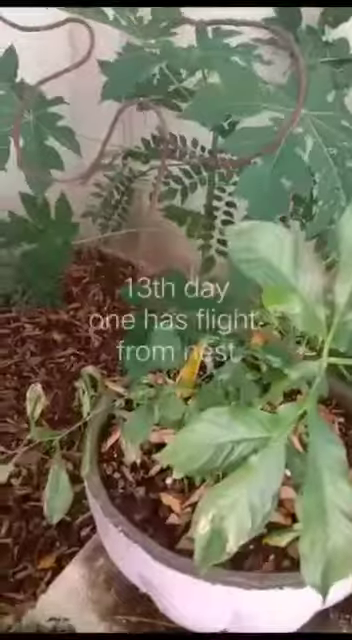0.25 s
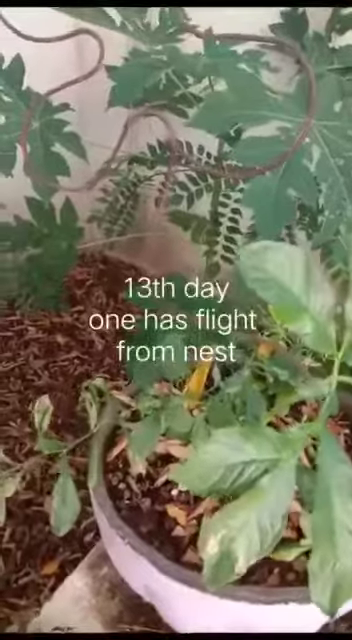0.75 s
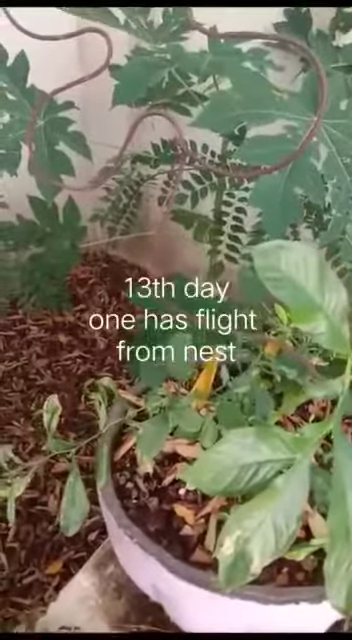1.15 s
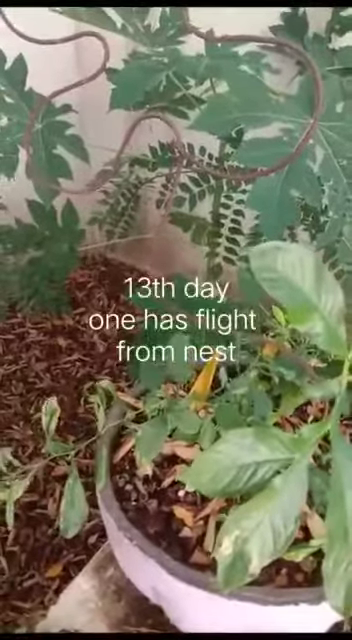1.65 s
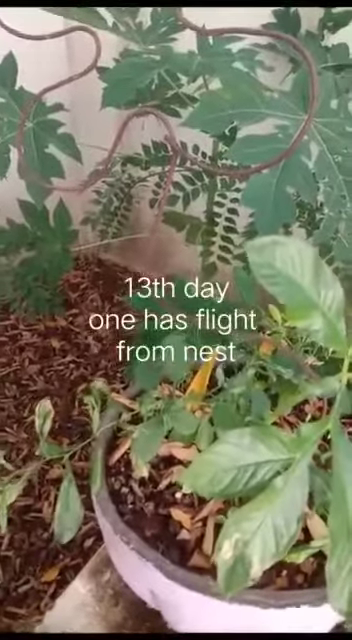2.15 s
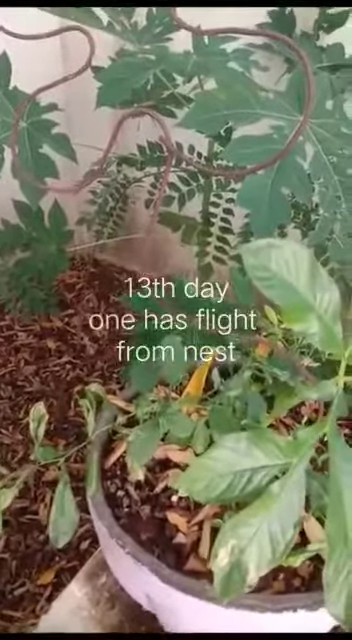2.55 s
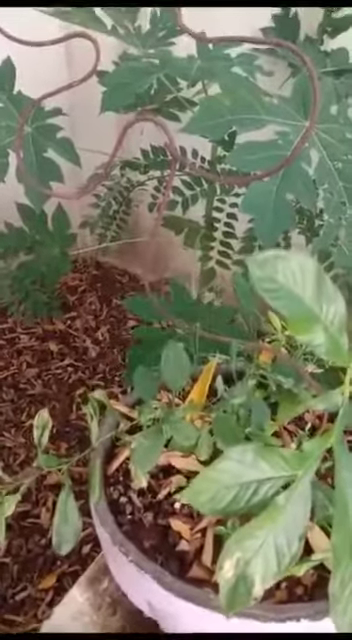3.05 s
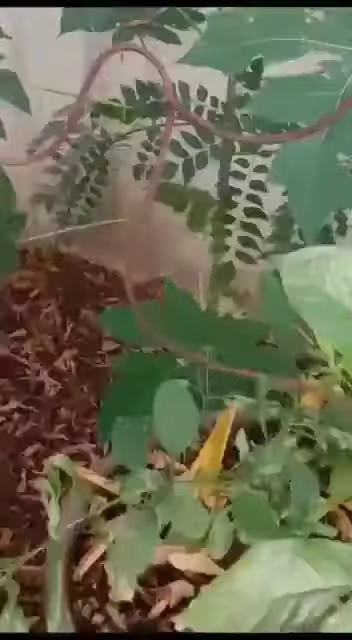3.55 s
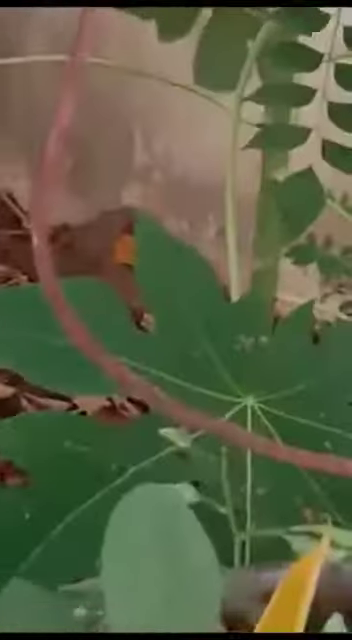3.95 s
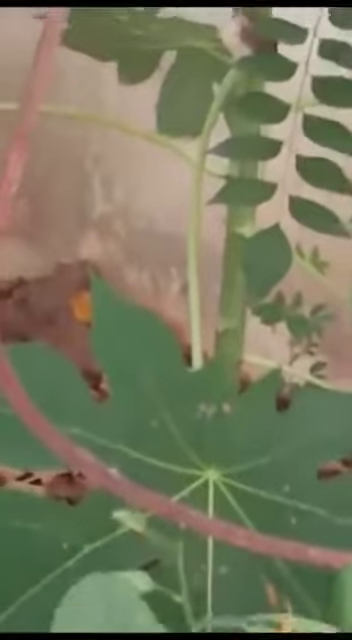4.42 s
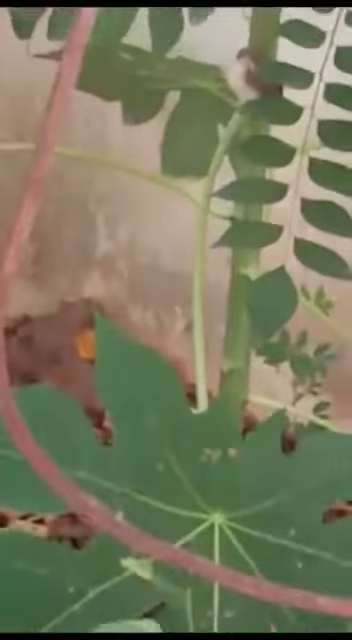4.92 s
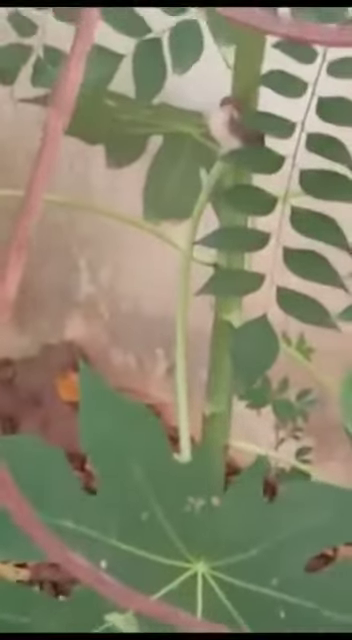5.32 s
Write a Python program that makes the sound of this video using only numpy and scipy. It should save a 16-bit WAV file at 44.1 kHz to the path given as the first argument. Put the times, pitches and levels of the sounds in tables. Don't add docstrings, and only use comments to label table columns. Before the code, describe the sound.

In a walled garden, short raspy bird chirps come at intervals above faint town noise and a fluttering machine hum, with one louder reply.

```python
import sys
import numpy as np
from scipy import signal
from scipy.fft import rfft, irfft, next_fast_len
from scipy.io import wavfile
from scipy.ndimage import uniform_filter1d, map_coordinates

SR = 44100
rng = np.random.default_rng(int(sys.argv[2]) if len(sys.argv) > 2 else 0)


def rack_gain(trim_db):
    fader = np.asarray(trim_db, float)
    return 10 ** (fader / 20)


def generate_wav(signal):
    frames = np.transpose(np.atleast_2d(signal))
    scaled = np.clip(frames, -1, 1) * 32767
    pcm = np.round(scaled).astype(np.int16)
    wavfile.write(sys.argv[1], SR, pcm)


N = 246078
T = np.arange(N) / SR

# multiple of the pitch, level in dB.
OVERTONES = [(2, -30), (3, -38), (4, -57)]
PURE = [(0.98, 0.012)] + OVERTONES
# frequency in Hz, level in dB.
THROAT = [(1200, -12), (1950, -19.5), (2500, -5.5), (3200, 3.5), (3800, -19.5), (4500, -28), (6000, -28.5),
          (7300, -39), (8200, -49), (12000, -53), (13500, -48), (15000, -41)]


def unit(x):
    return x / np.sqrt(np.mean(x ** 2) + 1e-20)


def along(points, hz):
    f, v = np.transpose(points)
    return np.interp(np.log(hz + 1), np.log(f + 1), v)


def curves(rows, t=T):
    s, *cols = np.transpose(rows)
    return [np.interp(t, s, c) for c in cols]


def wobble(rate, size=N):
    knots = rng.standard_normal(int(size * rate / SR) + 4)
    return map_coordinates(knots, [np.arange(size) * rate / SR])


def filtered(x, response):
    m = next_fast_len(x.shape[-1] + SR // 4)
    return irfft(rfft(x, m) * response(np.fft.rfftfreq(m, 1 / SR)), m)[..., :x.shape[-1]]


def ringing(hz, width):
    return lambda f: 1j * f * width / (hz * hz - f * f + 1j * f * width)


def narrow_noise(size, hz, width):
    return unit(filtered(rng.standard_normal(size), lambda f: ringing(hz, width)(f) ** 2))


def add(track, s, x):
    track[round(s * SR):][:len(x)] += x


def progress(length):
    return np.arange(int(length * SR)) / (length * SR)


def soft_ends(u):
    start = np.arange(len(u)) / (.0045 * SR)
    end = 4 * (1 - u)
    return np.sin(np.pi / 2 * np.clip(np.minimum(start, end), 0, 1))


def load_db():
    # time in seconds, level in dB.
    load = [(0.3, -61.5), (0.58, -62.5), (1.05, -61), (1.42, -61), (1.67, -65), (2.34, -64), (2.59, -61),
            (3.09, -63), (3.4, -64), (4.78, -63.5), (5.04, -61.5), (5.58, -65.5)]
    db, = curves(load)
    return db - np.median(db)


def town_noise(spectrum, db, patchy_db):
    z = signal.stft(rng.standard_normal(N + 512), nperseg=512)[2]
    field = uniform_filter1d(uniform_filter1d(rng.standard_normal(z.shape), 8, 0), 8, 1)
    noise = signal.istft(z * rack_gain(patchy_db * unit(field)), nperseg=512)[1][:N]
    coloured = unit(filtered(noise, lambda hz: rack_gain(along(spectrum, hz))))
    return rack_gain(db + 1.2 * wobble(9)) * coloured


def town_middle():
    # frequency in Hz, level in dB per Hz.
    middle = [(15, -51.5), (25, -25), (119, -6), (240, -13), (411, -14.5), (873, -21), (1270, -20),
              (1660, -25.5), (2180, -20.5), (2560, -23), (4630, -36.5), (6060, -32), (7930, -48.5),
              (15500, -49.5)]
    return town_noise(middle, -59.5, patchy_db=3.0)


def side_noise():
    # frequency in Hz, level in dB per Hz.
    apart = [(35, -42), (60, -12), (135, -11), (850, -12), (1260, -1), (1870, -18.5), (2150, -9.5),
             (2530, -11.5), (15500, -26.5)]
    return town_noise(apart, -78.0, patchy_db=2.0)


def port_hiss():
    return rack_gain(-90.0) * narrow_noise(N, 15100, 1500)


def pump():
    # frequency in Hz, width in Hz, delay in seconds, knock in dB, rub in dB.
    struck = [(112.5, 31, 0.0454, -64, -57), (185.1, 11, 0.0191, -69, -72.5),
              (409.6, 50, 0.00463, -67, -75.5), (779.7, 19, 0.029, -77.5, -82.5),
              (1253, 73, 0.074, -69.5, -64.5), (2181, 67, 0.02373, -69, -71.5)]
    # frequency in Hz, width in Hz, delay in seconds, length in seconds, level in dB.
    rattle = [(2740, 47, 0.015, 0.032, -80.5), (3685, 370, 0.0026, 0.04, -75),
              (6020, 660, 0.02, 0.032, -78.5), (9400, 450, .026, 0.016, -92)]
    # time in seconds, level in dB.
    facing = [(0, 1), (2.5, -7), (3.1, 7), (4.4, 4), (4.6, 0), (5.58, -10.5)]
    turns_per_s = 15.345
    hum_db = 1.08 * load_db() + 2 * wobble(8.2)
    whine_db = 1.2 * load_db() - 1.55 * (T - T.mean())
    knock_db = curves(facing)[0]
    turns = np.arange(int(N / SR * turns_per_s)) / turns_per_s
    out = np.zeros(N)
    for hz, width, delay, blow_db, rub_db in struck:
        blows = np.zeros(N)
        blows[np.round((turns + delay) * SR).astype(int)] = rack_gain(2.5 * rng.standard_normal(len(turns)))
        soft = lambda f: ringing(hz, width)(f) * ringing(hz, 1.6 * width)(f)
        knock = rack_gain(blow_db + knock_db * (hz > 2000)) * unit(filtered(blows, soft))
        rub = rack_gain(rub_db + 1.8 * wobble(10)) * unit(filtered(rng.standard_normal(N), soft))
        if hz < 300:
            swing_db = hum_db
        elif 1000 < hz < 1500:
            swing_db = whine_db
        else:
            swing_db = 0
        out += rack_gain(swing_db) * (knock + rub)
    for hz, width, delay, length, db in rattle:
        gate = np.sin(np.pi * np.clip((T - delay) % (1 / turns_per_s) / length, 0, 1))
        buzz = unit(filtered(gate * rng.standard_normal(N), lambda f: ringing(hz, width)(f) ** 2))
        out += rack_gain(db + 2.4 * wobble(7.6)) * buzz
    return out


def voice(hz, db, rasp, partials):
    n = len(hz)
    phase = 2 * np.pi * np.cumsum(hz * (1 + 0.0583 * rasp * wobble(493.3, size=n))) / SR
    stutter = 1 + 1.34 * rasp * wobble(324.8, size=n)
    tone = sum(rack_gain(level) * np.sin(k * phase) for k, level in partials)
    return np.sqrt(2) * rack_gain(db) * stutter * tone


def breath(db, rate_hz):
    n = len(db)
    puffs = np.sin(np.pi * np.cumsum(rate_hz * (1 + 0.255 * wobble(59.8, size=n))) / SR) ** 2
    throat_air = lambda f: rack_gain(along([(700, -63)] + THROAT, f))
    return rack_gain(db) * unit(filtered(puffs * rng.standard_normal(n), throat_air))


def note(length, start_hz, end_hz, db, rasp, partials):
    u = progress(length)
    tone = voice(start_hz + (end_hz - start_hz) * u, db, rasp, partials)
    air_db = np.full(len(u), db - 24 + 20 * rasp)
    return soft_ends(u) * (tone + breath(air_db, rate_hz=165))


def scolding():
    # start in seconds, length in seconds, start pitch in Hz, end pitch in Hz, level in dB.
    scolds = [
        (.012, 0.054, 3150, 2750, -54),
        (.072, 0.071, 4100, 3900, -56),
        (.065, 0.067, 2500, 2050, -53),
    ]
    out = np.zeros(N)
    for s, *glide in scolds:
        add(out, s, note(*glide, .8, PURE))
    return out


def chirp_whistle(length, top_hz, db, octave_db):
    # part of the length, pitch over the top pitch, level in dB.
    whistle = [(0, .87, -14), (.25, .95, -4), (.55, .995, 0), (.85, .995, -1), (1, .97, -14)]
    u = progress(length)
    pitch, level = curves(whistle, u)
    tone = voice(top_hz * pitch, db + level, 0.29, [(1, 0), (2, octave_db)] + OVERTONES[1:])
    return soft_ends(u) * (tone + breath(db + level - 11, rate_hz=149))


def chirp_rasp(db, bright_db):
    # part of the length, pitch in Hz, level in dB.
    rasp = [(0, 2500, 1), (.1, 2350, 1), (.27, 1800, -1), (.5, 1450, 0), (.75, 1290, 0), (.92, 1240, -3),
            (1, 1200, -14)]
    u = progress(.073)
    hz, level = curves(rasp, u)
    late_db = -7 * np.exp(-u / .1)
    partials = [(k, along(THROAT, k * hz) - 90 * (k * hz > 15600)) for k in range(1, 13)]
    buzz = voice(hz, db + level - 2 + .6 * late_db, .9 - .5 * u, partials)
    swell = rack_gain(db + bright_db - 31.5 + 3 * wobble(170, size=len(u))) * np.sin(np.pi * u ** 1.6)
    hiss = swell * narrow_noise(len(u), 14900, 1400)
    return soft_ends(u) * (buzz + breath(db + level - 3 + late_db, rate_hz=150) + hiss)


def chirps():
    # start in seconds, top of the whistle in Hz, delay of the rasp in seconds.
    calls = [
        (.163, 3540, .031),
        (1.26, 3620, .021),
        (1.398, 3600, .028),
        (4.836, 3720, .019),
        (4.985, 3520, .024),
    ]
    # whistle in dB, rasp in dB, brightness in dB, whistle octave in dB.
    effort = [(-34, -31, -23, -23.5), (-35.5, -29.5, 0.5, -17.5), (-34.5, -31, -1.5, -19.5),
              (-29, -30, 2.5, -27.5), (-28.5, -32, 3, -28)]
    out = np.zeros(N)
    for (s, top_hz, delay), (db, rasp_db, bright_db, octave_db) in zip(calls, effort):
        add(out, s, chirp_whistle(delay + .012, top_hz, db, octave_db))
        add(out, s + delay, chirp_rasp(rasp_db, bright_db))
        squeal = note(.035, 4900, 4200, rasp_db + bright_db - 25, 0.93, PURE)
        add(out, s + delay + .006, squeal)
    return out


def small_sounds():
    # frequency in Hz, level in dB, t60 in seconds, start phase in turns.
    tap = [(85, -18, .065, .25), (150, -12, .009, 0), (1100, -24, .006, 0)]
    # start in seconds, length in seconds, centre in Hz, width in Hz, level in dB.
    bursts = [(.87, .077, 1340, 620, -53), (1.053, .069, 600, 400, -53), (1.095, .08, 780, 500, -55),
              (.301, .087, 905, 1200, -58.5), (.46, .12, 3800, 200, -70), (.72, .08, 3800, 250, -67),
              (.86, .09, 3850, 250, -67), (.98, .05, 3750, 250, -69), (.74, .09, 5800, 200, -74),
              (.88, .06, 2500, 900, -64), (2.1, .1, 3800, 300, -68), (1.8, .15, 11000, 5000, -81),
              (2.09, .065, 112, 40, -49), (4.2, .039, 320, 40, -57), (2.5, .09, 118, 40, -49),
              (4.12, .07, 110, 40, -51), (4.38, .09, 105, 40, -51), (4.37, .09, 1270, 70, -62)]
    out, t = np.zeros(N), np.arange(SR // 10) / SR
    onset = 1 - np.exp(-(t / .00011) ** 2)
    ring = sum(rack_gain(db - 60 * t / t60) * np.cos(2 * np.pi * (hz * t + turn)) for hz, db, t60, turn in tap)
    add(out, .2356, onset * ring)
    for s, length, hz, width, db in bursts:
        n = int(length * SR)
        add(out, s, rack_gain(db) * np.hanning(n) ** .5 * narrow_noise(n, hz, width))
    return filtered(out, lambda f: 1j * f / (1j * f + 40))


def peep():
    out = np.zeros(N)
    add(out, 1.232, note(.045, 3600, 3380, -50, .25, PURE))
    return out


def far_bird():
    # start in seconds, level in dB.
    whistles = [
        (1.47, -64),
        (2.91, -62),
        (4.395, -62),
    ]
    # seconds from the start, pitch in Hz, level in dB.
    tune = [(0, 1516, 6.5), (.13, 1498, 3), (0.151, 1570, -7), (0.231, 1712, -4), (.29, 1830, -3),
            (.33, 1775, 3.5), (0.378, 1550, -3), (.43, 1260, -2)]
    out, t = np.zeros(N), np.arange(0, tune[-1][0], 1 / SR)
    hz, level = curves(tune, t)
    fade = np.sin(np.pi * np.linspace(0, 1, len(t))) ** 0.16
    for s, db in whistles:
        waver = rack_gain(db + level + 2.5 * wobble(30, size=len(t)))
        add(out, s, fade * waver * np.sin(2 * np.pi * np.cumsum(hz) / SR))
    return out


def mate():
    # start in seconds, length in seconds, start pitch in Hz, end pitch in Hz, level in dB.
    upper = [
        (2.515, 0.022, 5100, 4930, -55),
        (2.52, .021, 4480, 3290, -36),
        (2.529, 0.033, 3340, 3010, -30.5),
        (2.559, 0.051, 3529, 3385, -22.5),
        (2.604, .021, 3230, 3126, -20),
        (2.619, 0.0405, 4230, 3780, -35.5),
        (2.633, 0.03, 3554, 3517, -25.5),
    ]
    lower = [
        (2.595, .026, 2618, 2460, -35),
        (2.648, .033, 2944, 2792, -36),
        (2.674, .024, 2974, 2117, -37.5),
    ]
    # multiple of the pitch, level in dB.
    lower_tones = [(1, -0.5), (2, -8), (3, -27.5)]
    out, phrase_s = np.zeros(N), 2.52
    for s, *glide in upper:
        add(out, s, note(*glide, .08 + 2.6 * (s - phrase_s), PURE))
    for s, length, start_hz, end_hz, db in lower:
        rasp = 0.033 + 2.2e-5 * (start_hz - end_hz) / length
        add(out, s, note(length, start_hz, end_hz, db, rasp, lower_tones))
        add(out, s, note(1.8 * length, 0.99 * start_hz, end_hz, db - 10, 0.82, lower_tones))
    u = progress(0.21)
    hiss = rack_gain(-66.5 + 3.3 * wobble(90, size=len(u))) * narrow_noise(len(u), 9500, 4000)
    add(out, phrase_s, soft_ends(u) * hiss)
    return out


def cicada():
    # time in seconds, level in dB.
    swell = [(0, -85), (2.6, -84), (2.9, -72), (3.3, -75), (3.45, -100), (5.58, -94)]
    return rack_gain(curves(swell)[0] + 2.3 * wobble(32)) * narrow_noise(N, 5100, 300)


def early_echoes(x):
    # delay in seconds, level in dB.
    early = [(.0031, -7), (.0057, -9), (.0094, -9), (.0142, -12), (.019, -13)]
    echo = lambda f, k, s, db: (-1) ** k * rack_gain(db) * np.exp(-2j * np.pi * f * s)
    return filtered(x, lambda f: 1 + sum(echo(f, k, s, db) for k, (s, db) in enumerate(early)))


def garden(x, count=24):
    # frequency in Hz, t60 in seconds.
    walls = [(500, 0.3), (3000, 0.36), (7000, 0.3), (15000, 0.21)]
    hz, t, z = signal.stft(rng.standard_normal((count, SR // 3)), SR, nperseg=256)
    tails = signal.istft(z * rack_gain(-60 * t / along(walls, hz)[:, None]), SR, nperseg=256)[1]
    out, hop = np.zeros(N + SR), SR // 80
    window = np.sin(np.pi * np.arange(2 * hop) / (2 * hop))
    for k, start in enumerate(range(0, N - 2 * hop, hop)):
        piece = x[start:start + 2 * hop] * window
        if np.abs(piece).max() > 2e-5:
            tail = tails[k % count] / np.linalg.norm(tails[0])
            add(out, start / SR + .006, signal.fftconvolve(piece, tail))
    return out[:N]


def scene():
    near = early_echoes(scolding() + chirps() + peep() + mate())
    far, hand = far_bird(), small_sounds()
    town = rack_gain(1.0 + load_db())
    ground = np.clip(T / 0.12, 0, 1) * (pump() + cicada() + town * (town_middle() + port_hiss()))
    walls_answer = garden(rack_gain(-9) * near + rack_gain(-6) * far)
    mid = rack_gain(-5) * near + far + walls_answer + ground + rack_gain(1.5) * hand
    tilt = signal.resample_poly(rng.standard_normal(N // 40 + 2), 40, 1)[:N]
    side = town * side_noise() + rack_gain(-53.0) * tilt * mid
    return np.array([mid + side, mid - side])


def band_limit(x):
    return signal.sosfilt(signal.butter(12, 15690, fs=SR, output="sos"), x)


def record(dry):
    mix = dry * np.clip(T / 0.047, 0, 1) ** 0.44
    return band_limit(mix)


dry = scene()
out = record(dry)
generate_wav(out)
```